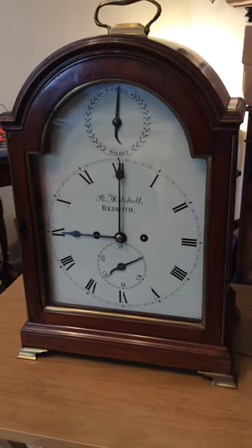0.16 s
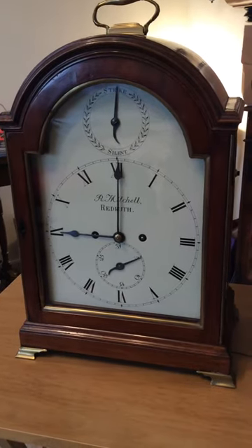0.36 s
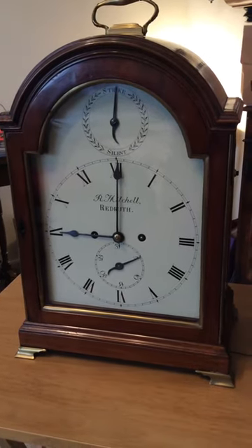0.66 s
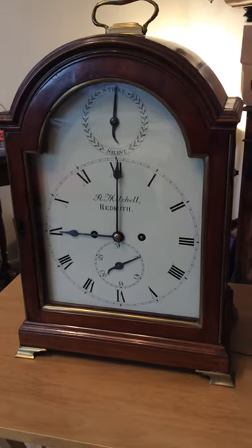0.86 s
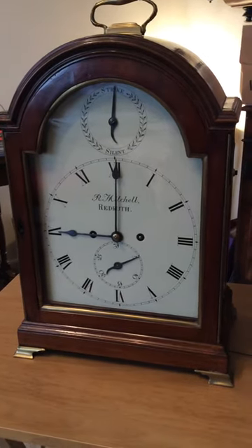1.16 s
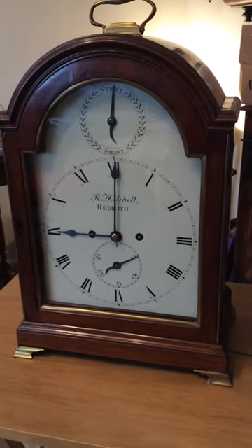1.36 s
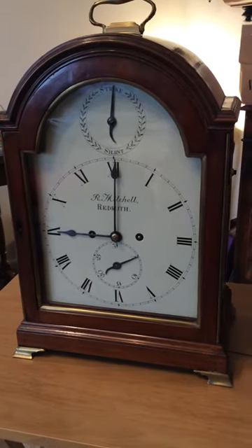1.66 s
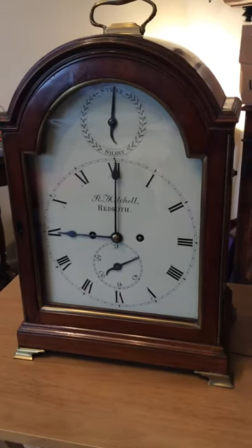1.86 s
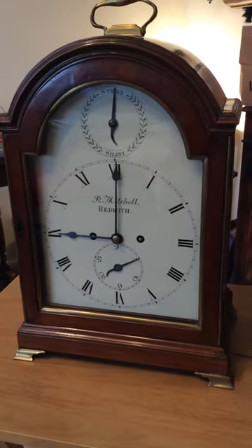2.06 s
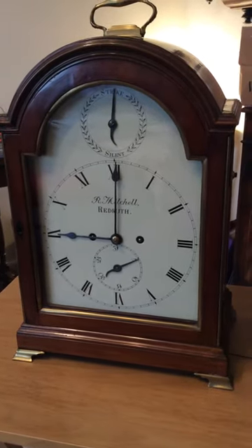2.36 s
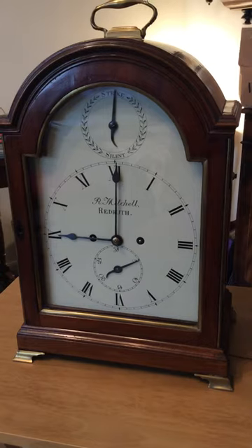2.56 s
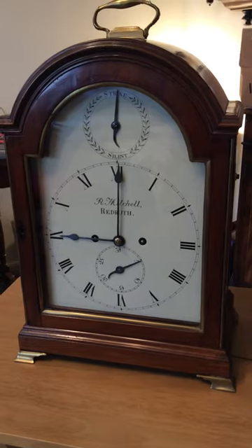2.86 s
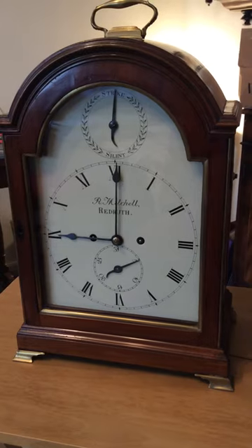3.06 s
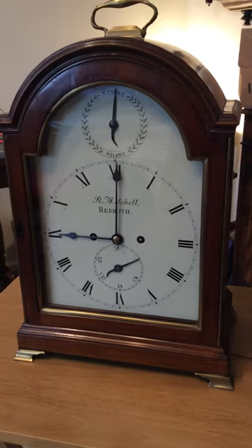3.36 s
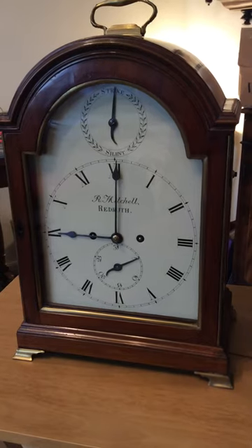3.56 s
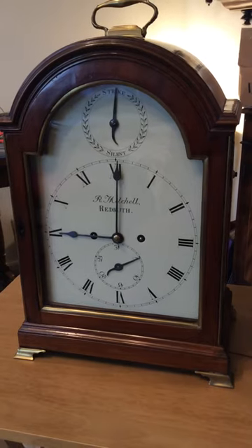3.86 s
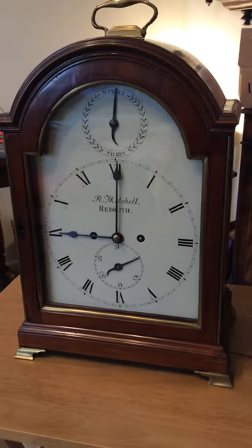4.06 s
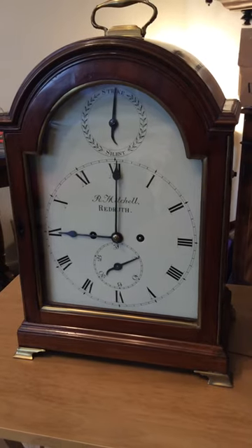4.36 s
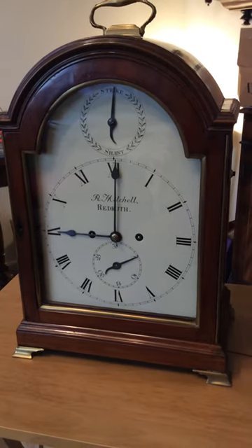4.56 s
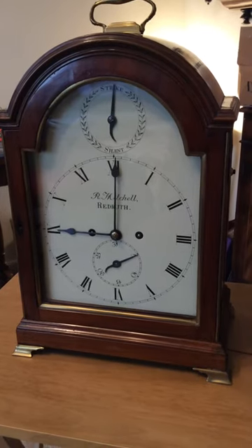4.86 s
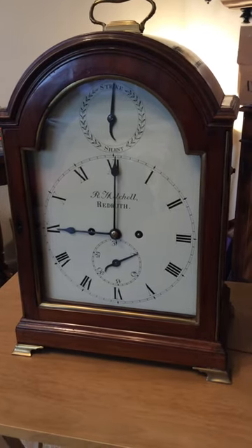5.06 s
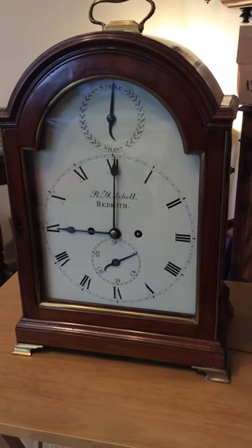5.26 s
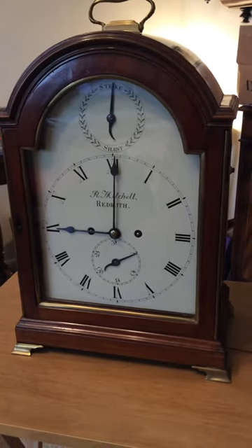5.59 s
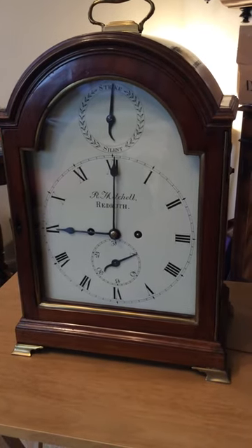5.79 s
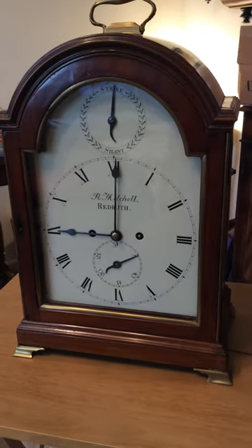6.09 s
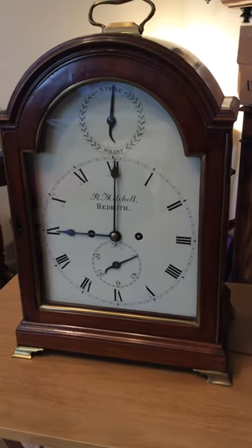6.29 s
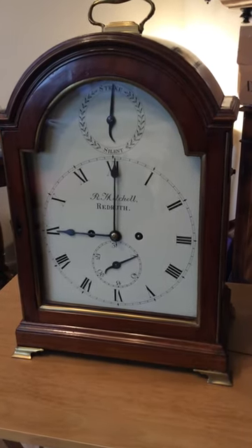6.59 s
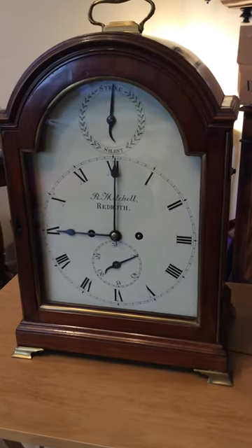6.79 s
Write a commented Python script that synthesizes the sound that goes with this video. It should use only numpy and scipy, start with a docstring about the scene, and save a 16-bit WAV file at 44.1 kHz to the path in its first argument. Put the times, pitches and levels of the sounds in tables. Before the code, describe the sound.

A small wooden-cased clock strikes its bell, heard close up. A leftover ring opens the scene, then five sharp, glassy strikes arrive evenly, each accompanied by a clack from the hammer mechanism. High treble sparkle vanishes quickly, leaving a thin, pulsing ring around 4 kHz. Beneath it run faint, slightly uneven ticks and tocks, light wheel clicks, soft room noise and barely perceptible mains hum.

```python
"""In a quiet room, a bracket clock strikes the hour while the ring of an earlier stroke still hangs in the air.
Room tone is coloured noise under mains hum; faint ticks and wheel clicks are filtered noise bursts.
At each stroke the hammer trips, hits and falls back, three noise bursts coloured by the clock's resonances.
The bell is a stack of decaying tones, most of them split into a close pair that throbs."""
import sys
import numpy as np
from scipy import signal
from scipy.fft import rfft, irfft, next_fast_len
from scipy.io import wavfile

SR = 44100
rng = np.random.default_rng(int(sys.argv[2]) if len(sys.argv) > 2 else 0)


def unload_wav(signal):
    """Save mono or channel-first audio to the path in sys.argv[1] as 16-bit WAV at rate SR, clipped to [-1, 1]."""
    wavfile.write(
        sys.argv[1],
        SR,
        np.round(np.clip(np.atleast_2d(signal).T, -1, 1) * 32767).astype(np.int16),
    )


N = 305613  # length in samples

# Hammer strokes; each meets a bell still moving, which helps or hinders its two longest-ringing partials:
# start_s, strength_db, treble_db, gain_1khz_db, gain_2400hz_pair_db, release_before_blow_s, drop_back_db
HAMMER_STROKES = [(-.447, -2, -4, -1, 0, .03, 0), (.84, -1, -0.5, -.4, -2, .025, .5),
                  (2.16, -2.5, 2, -.5, -0.6, .035, 2.5), (3.457, 2.5, -.5, -6, 1, .024, .5),
                  (4.777, -0.5, 0, -3.5, 7, .033, -0.5), (6.078, 0, 1, 2, -3.5, .044, -1)]
# Colours of the hammer's release, its blow and its drop back: pitch_hz, level_db
TRIP_COLOUR = [(50, -59), (120, -55), (400, -31), (850, -39.5), (1200, -38.5), (1550, -33.5), (2800, -42.5),
               (3800, -47.5), (5000, -55), (7000, -59), (15000, -61)]
BLOW_COLOUR = [(50, -57), (110, -37), (250, -30), (600, -38.5), (1200, -43), (1600, -34), (2800, -35),
               (3400, -28), (5000, -36), (9000, -39), (12000, -30), (15000, -34)]
RETURN_COLOUR = [(50, -52), (90, -29), (140, -42), (220, -32), (400, -36.5), (700, -41), (1200, -46),
                 (1580, -30), (1950, -37.5), (3000, -40.5), (5000, -56.5), (7500, -74)]
# Colours of the escapement and of the strike train's wheel: pitch_hz, level_db
TICK_COLOUR = [(100, -72), (230, -69.5), (400, -39), (600, -54), (1400, -49.5), (2100, -67), (3000, -43.5),
               (4000, -66.5), (7000, -94), (14000, -69.5)]
CLICK_COLOUR = [(100, -63.5), (400, -53), (900, -58), (1600, -51), (2200, -57.5), (3000, -52.5),
                (5000, -92.5), (14000, -87.5)]
# Colour of the room noise: pitch_hz, level_db
ROOM_COLOUR = [(25, -65), (50, -50), (140, -58), (220, -47.5), (400, -53.5), (650, -56.5), (840, -48),
               (950, -64), (1110, -48.5), (1300, -67.5), (2400, -60), (2900, -65), (3500, -71), (5200, -81),
               (7200, -82.5), (9300, -69.5), (11000, -64.5), (15000, -71.5)]
# Mains hum: pitch_hz, level_db (rms)
MAINS_HUM = [(50, -79.5), (99, -77)]
# Decay of case and room, before each contact's own ring factor: pitch_hz, t60_s
CASE_DECAY = [(100, 0.48), (400, 0.64), (1500, 0.28), (3500, 0.28), (8000, 0.17), (15000, 0.11)]
# Resonances of the wooden case, then of the brass plates and bell stand: centre_hz, width_hz, peak_db (before trim)
BODY_RESONANCES = [(95, 20, 2.5), (197.5, 13, 9.5), (276, 6.1, 3.5), (401, 87, 6), (480, 30, -0.5),
                   (575, 83, 10), (710, 10, 1), (835, 46, 15), (1060, 230, 6), (1427, 38, 10),
                   (1554, 57, 8.5), (2160, 90, 4.5), (2386, 69, 15.5), (2875, 74, 8.5), (3230, 54, 4.5),
                   (3365, 49, 10), (4070, 80, 2.5), (3884, 90, 16.5), (4130, 60, 7), (7700, 49, 17.5),
                   (7800, 100, 13.5), (10530, 450, 11), (13350, 450, 3), (14150, 450, 11.5)]
# Tones heard in the ring, most of them close pairs, the last a faint single tone beside the 4.07 kHz pair:
# pitch_hz, twin_offset_hz (0 for a single tone)
RING_PITCHES = [(747.9, 0), (998.3, 0), (2382, -7.6), (4072.3, 10.5), (6032.7, 16.2), (8252.1, -3.9),
                (10703, -2.8), (4764, -7.6), (10105, 22), (11090, 30), (12080, 14), (13396, -8),
                (14194, 45), (15218, 30), (4017.5, 0)]
# How each of these tones rings, in the same order:
# level_db (rms, before stroke gains), t60_s, rise_s, twin_db (against the main tone), first_beat_null_s
RING_SHAPES = [(-57, 4.96, 0.0047, -62.5, 0), (-52.5, 17, 0.0023, -63.5, 0), (-61, 25, 0.0033, -4, 0.071),
               (-37.5, 5.35, 0.0016, -0.5, 0.0826), (-35.5, 2.32, 0.0078, -4.5, 0.0243),
               (-30, 1.252, 0.0077, -3, 0.15), (-38, 0.95, 0.015, -8.5, .12),
               (-76.5, 3.9, .005, -6.5, 0.047), (-62, 1.2, 0.0037, -7, .03),
               (-43.5, 0.23, 0.0052, -7.5, .03), (-55, 0.44, .006, -4.5, 0),
               (-26.5, 0.24, 0.023, -14.5, 0.11), (-34, 0.28, 0.011, -18.5, 0.018),
               (-39.5, .22, .007, -10, .025), (-53.5, 6.7, .004, -59, 0)]

TOP_HZ = 15900  # upper band limit
BODY_TRIM_DB = -3.5
FULL_HZ, TREBLE_HZ = 4000, 7000  # tones below the first feel the strength less; treble starts above the second
FALL_S = .043  # the hammer drops back on its stop this long after the blow
TRIP_DB, BLOW_DB, RETURN_DB = -1, -.5, 3  # gains of a stroke's three contacts
# The escapement is a little out of beat: one strong tick and one weak tock per swing of the pendulum
SWING_S, FIRST_TICK_S, FIRST_TOCK_S = .797, .477, .04
TICK_DB, TOCK_DB = -2, -5
# A wheel of the running strike train clicks once a turn
TURN_S, FIRST_CLICK_S, CLICK_DB = .74, .073, 0
UNEVEN_DB = 0.2  # scatter from one tick or click to the next


def amp(db):
    """Decibels to gain."""
    return 10 ** (np.asarray(db) / 20)


def along(points, hz):
    """Read a curve of (Hz, value) points on a log frequency axis."""
    point_hz, values = np.transpose(points)
    return np.interp(np.log(hz + 1), np.log(point_hz), values)


def filtered(x, response):
    """Shape x with a gain that is a function of frequency."""
    size = next_fast_len(len(x) + 8192)
    hz = np.fft.rfftfreq(size, 1 / SR)
    return irfft(rfft(x, size) * response(hz), size)[:len(x)]


def noise(colour, size):
    """White noise tinted with a (Hz, dB) colour."""
    return filtered(rng.standard_normal(size), lambda hz: amp(along(colour, hz)))


def wobble(rate):
    """A random curve joined up from `rate` knots a second."""
    knots = rng.standard_normal(int(N * rate / SR) + 2)
    return np.interp(np.arange(N) * rate / SR, np.arange(len(knots)), knots)


def room():
    """Soft steady noise with a little mains hum: one sine per hum pitch."""
    t = np.arange(N) / SR
    hum = np.zeros(N)
    for hz, db in MAINS_HUM:
        hum += np.sqrt(2) * amp(db) * np.sin(2 * np.pi * (hz * t + rng.random()))
    return noise(ROOM_COLOUR, N) + hum


def body(hz):
    """Gain of the case and the movement: resonance peaks summed as power."""
    power = 1
    for centre_hz, width_hz, db in BODY_RESONANCES:
        detuning = 2 * (hz - centre_hz) / width_hz
        power = power + (amp(db) ** 2 - 1) / (1 + detuning ** 2) ** 2
    return amp(BODY_TRIM_DB) * np.sqrt(np.abs(power))


def knocks(events, colour, ring, snap, snap_s):
    """Contacts in the movement: a sharp snap, then the dense ring of case and room, treble dying first."""
    out = np.zeros(N + SR)
    t = np.arange(SR // 2) / SR
    raw = noise(colour, len(events) * len(t))
    bursts = filtered(raw, body).reshape(len(events), len(t))
    attack = (1 - np.exp(-t / 0.00063)) * (1 + snap * np.exp(-t / snap_s))
    for (start_s, db), burst in zip(events, bursts):
        hz, age, bands = signal.stft(burst, SR, nperseg=256)
        t60 = ring * along(CASE_DECAY, hz)[:, None]
        tail = signal.istft(bands * amp(-60 * age / t60), SR, nperseg=256)[1][:len(t)]
        out[round(start_s * SR):][:len(t)] += amp(db) * attack * tail
    return out[:N]


def repeats(first_s, period_s, db):
    """(s, dB) of a contact that comes round regularly, a little uneven in strength."""
    starts = np.arange(first_s, N / SR, period_s)
    return [(s, db + UNEVEN_DB * rng.standard_normal()) for s in starts]


def movement():
    """The escapement ticks and tocks while a wheel of the strike train clicks."""
    beats = repeats(FIRST_TICK_S, SWING_S, TICK_DB) + repeats(FIRST_TOCK_S, SWING_S, TOCK_DB)
    clicks = repeats(FIRST_CLICK_S, TURN_S, CLICK_DB)
    ticking = knocks(beats, TICK_COLOUR, ring=0.96, snap=0.52, snap_s=0.009)
    clicking = knocks(clicks, CLICK_COLOUR, ring=0.53, snap=.6, snap_s=.005)
    return ticking + clicking


def hammer():
    """The hammer is released, hits the bell and drops back, rattling the wooden case."""
    trips, blows, returns = [], [], []
    for s, *_, lead_s, drop_db in HAMMER_STROKES:
        if s > 0:  # the earlier stroke leaves only its ring
            trips.append((s - lead_s, TRIP_DB))
            blows.append((s, BLOW_DB))
            returns.append((s + FALL_S, RETURN_DB + drop_db))
    trip = knocks(trips, TRIP_COLOUR, ring=1.0, snap=0.28, snap_s=.006)
    blow = knocks(blows, BLOW_COLOUR, ring=0.93, snap=0.83, snap_s=0.012)
    back = knocks(returns, RETURN_COLOUR, ring=1.0, snap=0.43, snap_s=0.014)
    return trip + blow + back


def bell(scatter=0.28, settle_s=0.38, drift=0.12, twin_rise_s=0.0044):
    """Each stroke renews every tone, a harder one more brightly; an uneven rim splits most into beating pairs."""
    out = np.zeros(N)
    t = np.arange(N) / SR
    ends = [row[0] for row in HAMMER_STROKES[1:]] + [N / SR]
    for (hz, split_hz), (db, t60, rise, twin_db, null) in zip(RING_PITCHES, RING_SHAPES):
        flutter = wobble(200) + 1j * wobble(200)
        waver = 1 + drift * wobble(24)
        shortness = hz / 8000  # short waves are the most sensitive to reflections
        for (s, strength_db, treble_db, low_db, mid_db, *_), end in zip(HAMMER_STROKES, ends):
            span = slice(max(int(s * SR), 0), int((end + .03) * SR))
            age = np.maximum(t[span] - s, 0)
            # the twin takes a moment to set in; with no offset it does not beat
            twin = amp(twin_db) * (1 - np.exp(-age / twin_rise_s))
            beat = 1 - twin * np.exp(2j * np.pi * split_hz * (age - null))
            tone = np.exp(2j * np.pi * (hz * age + rng.random()))
            force_db = strength_db * min(hz / FULL_HZ, 1) + treble_db * (hz > TREBLE_HZ)
            # the faint octave of the 2.4 kHz pair follows that pair
            met_db = {998: low_db, 2382: mid_db, 4764: mid_db}.get(round(hz), 0)
            level_db = db + force_db + met_db - 60 * age / t60
            # the new ring swells as the old one gives way
            swell = 1 - np.exp(-age / rise)
            give_way = np.exp(-np.maximum(t[span] - end, 0) / min(rise, .006))
            # reflections ruffle the tone until the room has filled
            ruffle = waver[span] + scatter * shortness * flutter[span] * np.exp(-age / settle_s)
            out[span] += np.sqrt(2) * amp(level_db) * swell * give_way * np.real(ruffle * beat * tone)
    return out


def scene():
    """Room, movement, hammer and bell together, in mono."""
    return (room() + movement() + hammer() + bell())[None]


def record(dry):
    """Nothing passes above the band limit."""
    return np.array([filtered(x, lambda hz: hz < TOP_HZ) for x in dry])


dry = scene()
out = record(dry)
unload_wav(out)
```